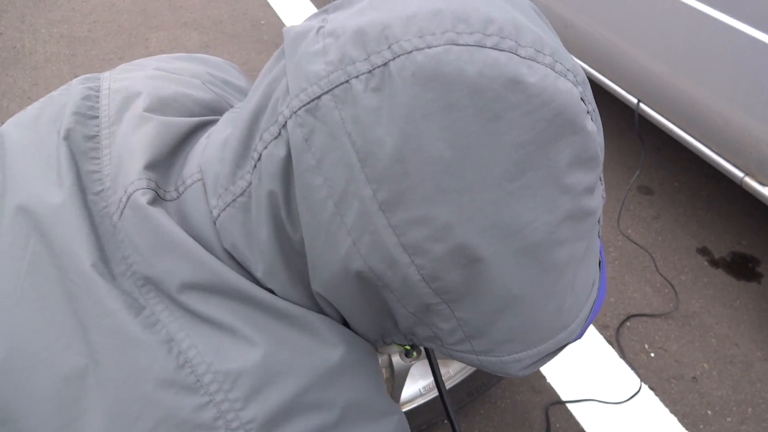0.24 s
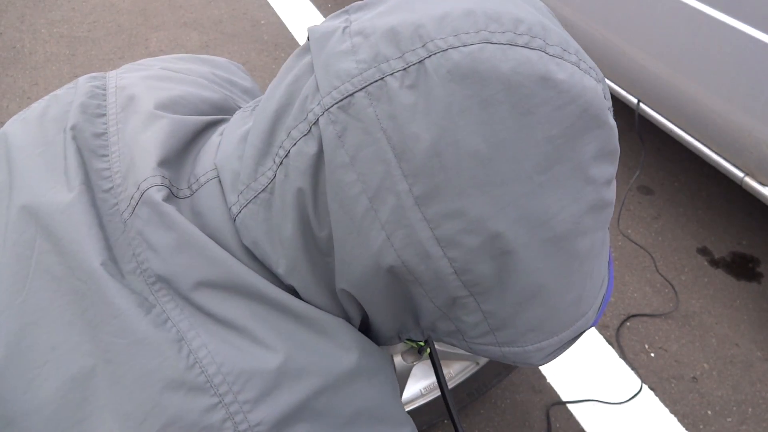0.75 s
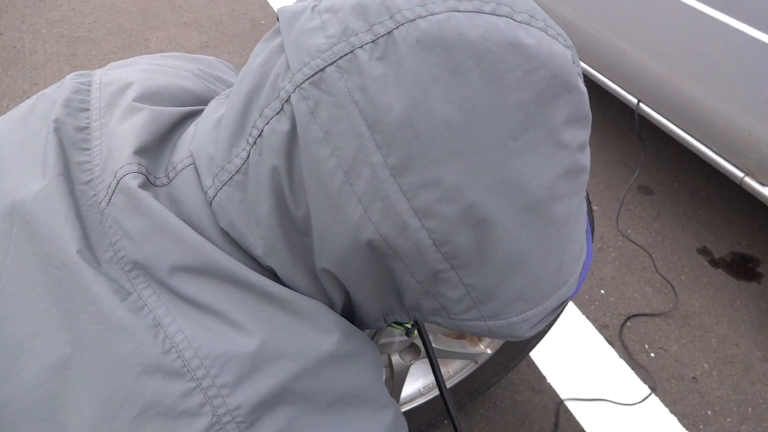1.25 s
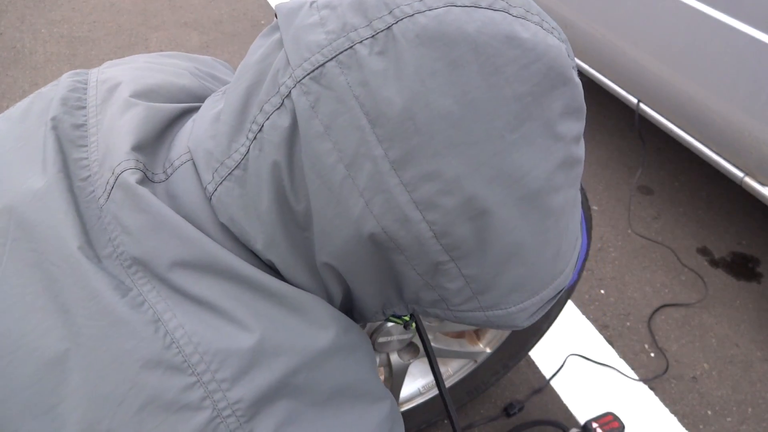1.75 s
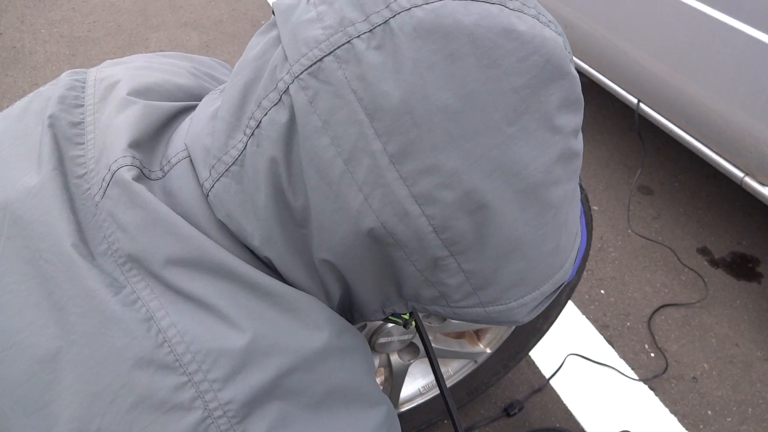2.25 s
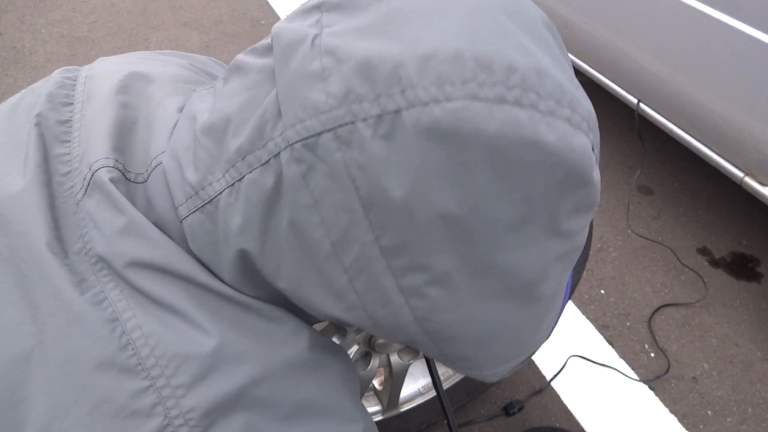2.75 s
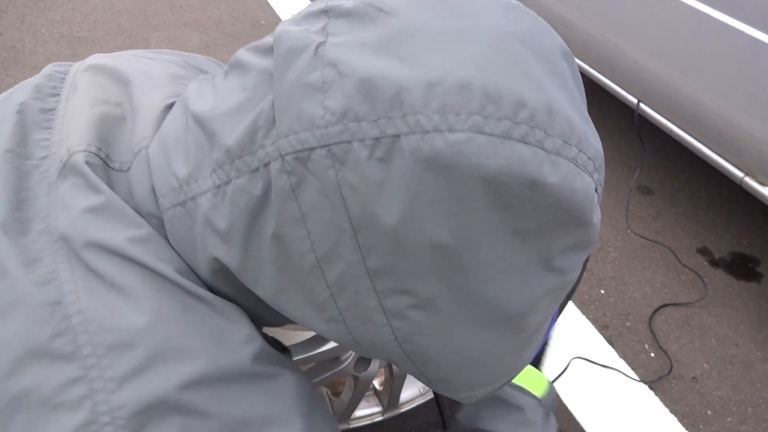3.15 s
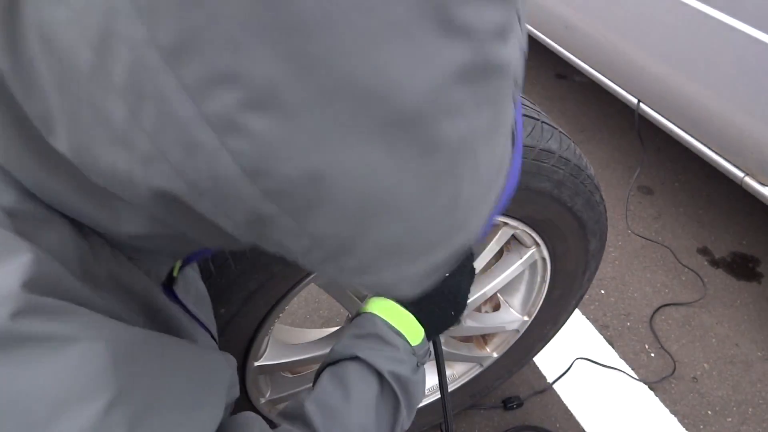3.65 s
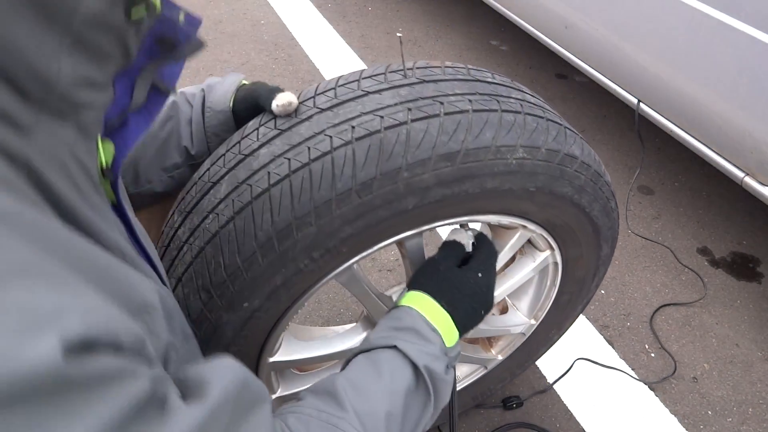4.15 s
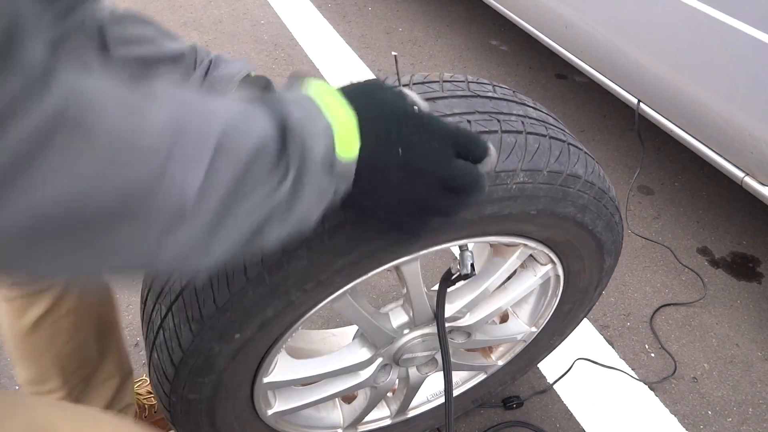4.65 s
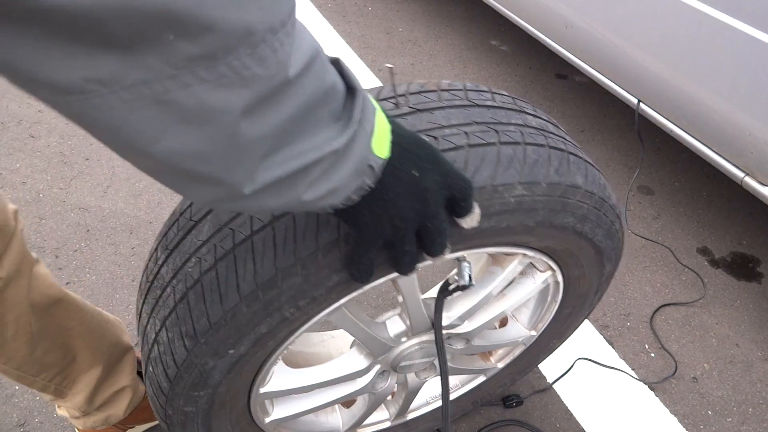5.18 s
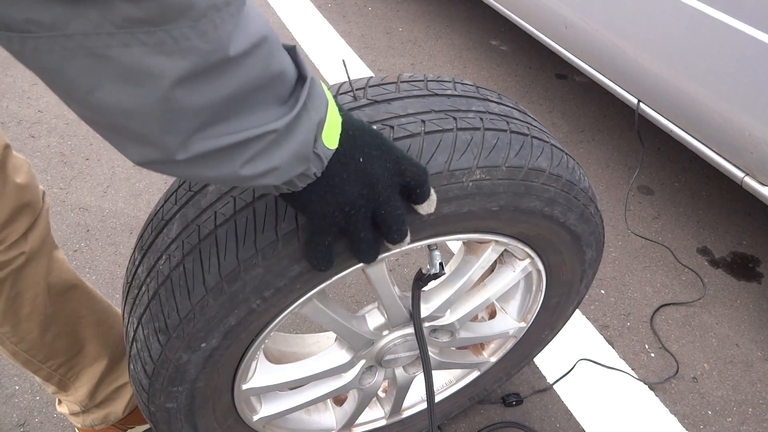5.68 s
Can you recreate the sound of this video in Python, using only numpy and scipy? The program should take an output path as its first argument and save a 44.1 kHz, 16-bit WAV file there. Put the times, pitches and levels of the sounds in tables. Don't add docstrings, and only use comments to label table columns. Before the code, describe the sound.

Continuous hard, nasal chatter of a portable tyre compressor on asphalt, slightly muffled and shifting as someone moves, then more open and even.

```python
import sys
import numpy as np
from scipy import signal
from scipy.fft import rfft, irfft
from scipy.io import wavfile
from scipy.ndimage import uniform_filter1d, map_coordinates

SR = 44100
rng = np.random.default_rng(int(sys.argv[2]) if len(sys.argv) > 2 else 0)


def linear_from_db(decibels):
    return 10 ** (np.asarray(decibels, float) / 20)


def pcm_store(signal):
    levels = np.round(np.clip(np.atleast_2d(signal), -1, 1) * 32767)
    wavfile.write(sys.argv[1], SR, levels.astype(np.int16).T)


N = 261072
TIME_S = np.arange(N) / SR
FREQUENCY_HZ = np.arange(N // 2 + 1) * SR / N


def rms_one(x):
    return x / np.sqrt(np.mean(x ** 2) + 1e-20)


def in_time(rows):
    s, *columns = np.transpose(rows)
    return [np.interp(TIME_S, s, column) for column in columns]


def coloured(x, points):
    hz, db = np.transpose(points)
    log_hz = np.log(np.maximum(FREQUENCY_HZ, 1))
    gain_db = np.interp(log_hz, np.log(hz), db, left=-70, right=-70)
    return rms_one(irfft(rfft(x) * linear_from_db(gain_db), N))


def resonance(x, hz, width_hz):
    r = np.exp(-np.pi * width_hz / SR)
    peak = (1 - r * r) / 2
    return signal.lfilter([peak, 0, -peak], [1, -2 * r * np.cos(2 * np.pi * hz / SR), r * r], x)


def moving_peak(x, hz, width_hz):
    spin = np.exp(2j * np.pi * np.cumsum(hz) / SR)
    lowpass = signal.butter(2, width_hz, fs=SR, output="sos")
    return rms_one(np.real(signal.sosfilt(lowpass, x * np.conj(spin)) * spin))


def drift(rate_hz):
    count = int(N * rate_hz / SR) + 2
    return np.interp(TIME_S * rate_hz, np.arange(count), rng.standard_normal(count))


def grit(spread_db):
    return rms_one(rng.standard_normal(N) * linear_from_db(spread_db * np.minimum(rng.exponential(1, N), 5)))


# start_s, looseness of parts [0-1], firmness of seat on the ground [0-1],
# clear view past the body [0-1]
STATE = [(0, 0.87, 0, 0.2), (.6, 0.9, 0.07, 0.16), (1.22, 0.6, 0, 0.17), (1.36, 0.34, 0, 0),
         (1.75, 0.01, 0.64, 0), (2.3, 0.19, 0.6, 0.36), (2.9, 0.24, 0.2, 0.32), (3.2, 0.5, 0.6, 0.2),
         (3.45, 0.3, 1, 0.33), (3.7, 0.51, 0.9, 0.53), (4.2, 0.7, 1, 0.4), (4.7, 0.37, 0.85, 0.89),
         (5.3, 0.34, 0.85, 1), (5.92, 0.3, 0.75, 1)]


def by_state(rest, *per):
    rows = np.array(STATE)
    return in_time(np.c_[rows[:, 0], rest + rows[:, 1:] @ per])[0]


ANSWERS = {"knock dB": (-26, 3, 2.5, -3, -1.5), "snap dB": (-31, -11, 2.5, 2, 0),
           "whine dB": (-27.5, -4.5, -8, 6, -3), "rattle 800 dB": (-29, 12, 1.5, 2, -13),
           "rattle 900 dB": (-30, -4.5, 2, 17, -1), "rattle 1400 dB": (-36, 17, -9, 11.5, 15.5),
           "rattle 1400 Hz": (1367, -10, 0, 45, 103), "broad rattle dB": (-28.5, 6, -4.5, -1, -4),
           "shadow depth": (-0.098, 0.61, 0.37, -0.31, 0.35), "modes 1 dB": (7, 1.5, -3, -3, -2),
           "modes 2 dB": (0, -17, 0.5, 8, -9), "modes 3 dB": (-3.5, -16, 25, 4, 3),
           "leak share": (0.4, 0.13, -0.053, 0.022, 0.091), "rattle 620 dB": (-45.5, 19, -2, -1, -2),
           "play": (1.0, 1.5, 0, -0.5, 1.0), "left-right dB": (-2.5, -0.4, 0.65, 0.9, 0.19),
           "hiss modes dB": (-1.5, -1.5, 0, -0.5, -5.5)}


def answer(part):
    jolt_s, jolt_length_s = 1.404, 0.078
    *steady, per_jolt = ANSWERS[part]
    return by_state(*steady) + per_jolt * np.exp(-((TIME_S - jolt_s) / jolt_length_s) ** 2)


# pitch_hz, width_hz, level_db
HOUSING = [(467.3, 23.5, 4.5), (612, 45, -11), (646, 16, -17), (884, 23, 2), (990, 11, 5.5),
           (1184, 76, -15), (639, 11, -6.5), (1275, 91, 2), (1457, 33, -1)]
MODE_GROUP = [0, 1, 0, 2, 1, 1, 0, 1, 3]


def contacts(turns, speed, table, late_ms, uneven_db):
    out = np.zeros(N)
    freedom_db = [0, answer("modes 1 dB"), answer("modes 2 dB"), answer("modes 3 dB")]
    late_ms = late_ms * np.clip(answer("play"), .2, 6)
    for at_turn, db, hz, ms in table:
        turn = np.round(turns - at_turn).astype(int)
        late, strength = np.clip(rng.standard_normal((300, 2)), -2, 2)[turn].T
        s = (turns - at_turn - turn) / speed - late_ms * late / 1000
        burst = np.exp(-(s * 1000 / ms) ** 2) * np.cos(2 * np.pi * hz * s)
        out += linear_from_db(db + uneven_db * strength) * burst
    out = rms_one(signal.sosfilt(signal.butter(4, 385, "high", fs=SR, output="sos"), out))
    ringing = 0
    for (hz, width_hz, db), group in zip(HOUSING, MODE_GROUP):
        ringing = ringing + resonance(out * linear_from_db(db + freedom_db[group]), hz, width_hz)
    return out + ringing


# order [per turn], rest_db, per_looseness_db, per_firmness_db, per_clear_view_db
SINGING = [(9, -45, 4.5, 0, 3.5), (8, -49.5, -9, 2.0, -5), (10, -36.5, -3.5, 1.5, 3),
           (11, -40, 7, -4, -3.5), (13, -48, 6, -2, -16), (21, -40.5, -11, 7, 1), (33, -44, 0.5, 8, 1.5),
           (14, -38.5, 8, -4.5, -1), (15, -28.5, -1, 2.5, -12.5), (16, -30, -7.5, 0, -0.5),
           (20, -42, 7, -7.5, 17.5), (23, -39, -7, 11, -13), (17, -44, -15, -1, 2), (18, -39.5, 5, -2, -7),
           (19, -46, 4, 3, 12.5), (26, -43, -13, 1, 1), (25, -39, -2, -3, -5), (30, -37, 4.5, 6, -10),
           (32, -35, -9, -8, -7)]


def singing(strokes, turns):
    out = 0
    for order, *levels_db in SINGING:
        spin = np.exp(2j * np.pi * order * turns)
        phase = np.angle(np.vdot(spin, strokes))
        out = out + linear_from_db(by_state(*levels_db) + 1.3 * drift(18)) * np.real(spin * np.exp(1j * phase))
    return out


# at_turn [0-1], level_db, pitch_hz, length_ms
KNOCKS = [
    (0.958, 6, 587, 1.56),
    (0.05, -3, 620, 0.69),
    (.095, -4.5, 1020, 0.73),
    (0.2, -3, 551, 3.7),
    (.44, -7.5, 880, 1.9),
    (.952, -4, 990, 0.85),
    (.832, -10, 630, 0.97),
]
# at_turn [0-1], level_db, pitch_hz, length_ms
SNAPS = [
    (.64, 7, 930, 0.62),
    (0.922, -19, 210, 0.89),
    (0.0953, -14, 1430, 0.99),
]


def pump(turns, speed):
    knocks = contacts(turns, speed, KNOCKS, late_ms=.06, uneven_db=1.2)
    snaps = contacts(turns, speed, SNAPS, late_ms=.03, uneven_db=2.0)
    strokes = linear_from_db(answer("knock dB") - 1.0) * knocks + linear_from_db(answer("snap dB") - 0.5) * snaps
    whine = np.sin(2 * np.pi * np.cumsum(796 + 7.03 * drift(30)) / SR)
    whine = whine * (1 + 0.47 * np.cos(2 * np.pi * (turns - .4)))
    hum = 0
    for order, db in [(2, -49), (4, -49), (5, -53), (6, -50.5), (7, -45)]:
        hum = hum + linear_from_db(db) * np.sin(2 * np.pi * order * turns)
    return strokes + singing(strokes, turns) + linear_from_db(answer("whine dB") + 2.5 + 1.8 * drift(20)) * whine + hum


# frequency_hz, density_db [dB per Hz]
RATTLE_FLOOR = [(250, -33), (400, -4.5), (520, -11), (640, -1), (800, -7.5), (1100, -2.5), (1500, -4.5),
                (1900, -31), (2500, -15)]


def rattle(turns):
    shake = grit(1.3) * linear_from_db(1.1 * np.cos(2 * np.pi * (turns - .72)) + 1.5 * drift(30))
    twice = resonance(resonance(shake, 686, 200), 686, 200)
    return (linear_from_db(answer("rattle 620 dB")) * rms_one(twice)
            + linear_from_db(answer("rattle 800 dB") - 4.5) * rms_one(resonance(shake, 775, 109))
            + linear_from_db(answer("rattle 900 dB") - 10.5) * rms_one(resonance(shake, 899, 52))
            + linear_from_db(answer("rattle 1400 dB") - 9.5) * moving_peak(shake, answer("rattle 1400 Hz"), 63)
            + linear_from_db(answer("broad rattle dB")) * coloured(shake, RATTLE_FLOOR))


def shadowed(x):
    loose, firm, view = in_time(STATE)
    x = x - np.clip(.6 - 0.83 * view, 0, 1) * resonance(x, 841, 30)
    x = x - np.clip(0.33 * loose - 0.16 * firm, 0, 1) * resonance(x, 530, 40)
    return x - np.clip(answer("shadow depth"), 0, 1) * resonance(x, 1076, 280)


# opens_turn [0-1], shuts_turn [0-1], sag_db, hiss_db, top_db
GUSTS = [
    (0.198, 0.52, -4, -0.5, 3),
    (0.612, 0.83, -10.5, 6.5, -5),
]


def gusts(turns, leak, column):
    flow = leak.copy()
    for opens, shuts, sag_db, *level_db in GUSTS:
        gone = ((turns - opens) % 1) / (shuts - opens)
        uneven_db = 2.8 * np.clip(rng.standard_normal(300), -2, 2)[(turns - opens + 1).astype(int)]
        strength = linear_from_db(level_db[column] + sag_db * gone + uneven_db)
        gate = np.clip(gone * 25, 0, 1) * np.clip((1.1 - gone) * 5, 0, 1)
        flow = flow + (1 - leak) * strength * gate
    return flow / np.sqrt(uniform_filter1d(flow ** 2, size=8000))


def tooth_noise(turns, spread_db, repeat):
    patterns = grit(spread_db)[:60 * 1000].reshape(60, 1000)
    again = map_coordinates(patterns, [turns / 6.0, (turns % 1) * 999], order=1)
    return np.sqrt(repeat) * rms_one(again) + np.sqrt(1 - repeat) * grit(spread_db)


# start_s, hiss_db, jet_over_hiss_db
AIR = [(0, -21.5, -3), (.9, -23.5, -4.5), (1.27, -26.5, -8), (1.4, -21.5, -4.5), (1.55, -24.5, -4.5),
       (1.83, -26.5, -1), (2.72, -25.5, -6.5), (2.98, -26, -3), (3.1, -24.5, -9), (3.36, -23.5, -6),
       (3.71, -25.5, -7), (4, -23.5, -2), (4.32, -24.5, -3.5), (5.31, -25.5, -2), (5.92, -25, -5)]
# frequency_hz, density_db [dB per Hz]
HISS_FLOOR = [(1500, -13), (2000, -5), (3000, -5.5), (5000, -6), (7000, -9), (9000, -13), (11000, -16.5)]
JET_TOP = [(6000, -16), (8000, -6.5), (9500, -3), (10400, 5), (11500, -3)]
# frequency_hz, level_db
HISS_TILT = [(1500, 12.5), (3000, -1.5), (6000, 2.5), (10000, 5.5)]
# pitch_hz, width_hz, level_db, per_firmness_db, per_clear_view_db
HISS_MODES = [(1680, 190, 3.5, -5.5, -28), (2246, 75, 4.5, -2, -1.5), (2712, 58, 8, -1, 1),
              (2990, 57, 2, 7, -5), (3490, 88, 4.5, 0, 4.5), (3780, 54, 8, -8.5, 6.5),
              (4330, 135, -6.5, 12, 6), (4786, 117, 4.5, -11.5, 12.5), (5220, 320, -2, 4.5, 2.5),
              (5940, 170, -3.5, 6, 3.5), (6570, 110, -8, 8.5, 4), (7470, 100, 0, 0, -12),
              (8270, 100, 0.5, 0, -6), (9360, 87, -6.5, 5, -4)]
# pitch_hz, width_hz, depth [0-1]
VALLEYS = [(1840, 390, 0.37), (2260, 27, 0.24), (3240, 79, 1), (4180, 84, 0.06), (6760, 110, .5),
           (8530, 600, 0.4)]
# start_s, hollow_hz (between coat and tyre), hollow_db, echo_delay_ms, echo_share [0-1]
BODY = [(0, 5630, -11.5, 1.055, 0.2), (.95, 5740, -6, 1.08, 0.18), (1.28, 5550, -6, 1.13, 0.2),
        (1.36, 5000, -20.5, 0.69, 0), (1.52, 5300, -12, 0.37, 0.09), (1.6, 5440, -14, 0.328, 0.35),
        (1.93, 5300, -10, 0.335, 0.4), (2.1, 5970, -10, .67, 0.051), (2.55, 6150, -11.5, 0.69, 0.14),
        (2.9, 5950, -9.5, .67, 0.066), (3.05, 5250, -11.5, .21, 0.09), (3.45, 4760, -9, 0.2, 0.13),
        (3.6, 5660, -12, 0.95, 0.33), (3.8, 5530, -19, 0.91, 0.15), (4.4, 5270, -20, 0.83, 0),
        (4.7, 5100, -27, 1.14, 0), (5.92, 5100, -35, 1.15, 0.046)]


def air(turns):
    hiss_db, top_db = in_time(AIR)
    _, firm, view = in_time(STATE)
    hollow_hz, hollow_db, echo_ms, echo = in_time(BODY)
    leak = np.clip(answer("leak share"), .05, .95)
    jet = tooth_noise(turns, spread_db=2.5, repeat=0.17) * gusts(turns, leak, column=0)
    other = tooth_noise(turns, spread_db=1.5, repeat=0.073) * gusts(turns, leak, column=0)
    other = coloured(other, HISS_TILT)
    rung = 0
    for k, (hz, width_hz, db, firm_db, view_db) in enumerate(HISS_MODES):
        gain = linear_from_db(db + firm_db * firm + view_db * view + 2.1 * drift(9))
        rung = rung + (-1) ** k * gain * resonance(other, hz, width_hz)
    hiss = (linear_from_db(-1.0) * coloured(jet, HISS_FLOOR) + linear_from_db(answer("hiss modes dB")) * rms_one(rung)
            + linear_from_db(hollow_db + 1.5 * drift(7.1)) * moving_peak(other, hollow_hz, width_hz=340))
    delayed = np.interp(np.arange(N) - echo_ms * SR / 1000, np.arange(N), hiss)
    hiss = (hiss + echo * delayed) / np.sqrt(1 + echo ** 2)
    for hz, width_hz, depth in VALLEYS:
        hiss = hiss - depth * resonance(hiss, hz, width_hz)
    top = coloured(grit(3.8) * gusts(turns, 0.69 * leak, column=1), JET_TOP)
    top = top + linear_from_db(-6.0 + 16 * np.minimum(view, .55)) * resonance(top, 10530, 160)
    return linear_from_db(hiss_db + 0.85 * drift(12)) * (hiss + linear_from_db(top_db - 1.5) * top)


# frequency_hz, lead_radians, level_db
LEFT_LEAD = [(0, .1, 1.5), (380, .36, -.8), (520, 0.44, 1.2), (800, 0.46, 0.9), (1500, 0.54, -0.5),
             (3000, 0.24, .1), (4500, .12, 0.4), (12000, .08, .2)]
# frequency_hz, level_db
SCATTER = [(100, -10), (300, -4), (500, -1.5), (900, -5.5), (1150, -3), (2400, 0.5), (5600, -2),
           (12000, -1.5)]


def surroundings(x):
    hz, radians, db = np.transpose(LEFT_LEAD)
    lead = np.exp(.5 * np.interp(FREQUENCY_HZ, hz, 1j * radians + np.log(linear_from_db(db))))
    direct = irfft(rfft(x) * np.array([lead, 1 / lead]), N)
    age_s = np.arange(16000) / SR
    decay = linear_from_db(-60 * age_s / .6) * np.clip(age_s / .03, 0, 1)
    scatter = rng.standard_normal(len(age_s)) * decay
    already_running = np.r_[x[:16000], x]
    echo = coloured(signal.fftconvolve(already_running, scatter)[16000:N + 16000], SCATTER)
    return direct + linear_from_db(-13.0) * np.std(x) * echo * [[1], [-1]]


# start_s, level_db
WIND = [(0, -37.5), (.8, -41.5), (1.5, -38), (2.6, -42), (3.0, -43.5), (3.6, -39), (4.1, -47),
        (5.92, -46.5)]
# frequency_hz, density_db [dB per Hz]
WIND_COLOUR = [(7.1, -40), (12, 1.5), (81, 3), (136, -3), (264, -10), (330, -12), (430, -44), (730, -120)]
WIND_APART = [(12, 6), (60, -3), (130, -1), (220, -4), (330, -8), (450, -30)]
# centre_s, level_db
PUFFS = [(.12, 11.5), (.28, 5), (.35, -7), (.45, -8), (.86, 2), (.96, 3), (1.14, 1), (1.43, 6.5), (1.63, 4),
         (1.74, 5.5), (2.01, 4), (2.13, 2), (2.21, 9), (2.35, -6), (2.5, 8), (2.6, 12), (2.78, 0),
         (3.33, 10), (3.9, -7), (4.1, 0), (4.17, -17), (4.4, 4), (4.6, -8), (4.91, -5), (5.12, 10),
         (5.18, -6), (5.74, -1), (5.85, 5)]


def wind():
    shared = coloured(rng.standard_normal(N) * linear_from_db(0.66 * drift(14)), WIND_COLOUR)
    apart = coloured(rng.standard_normal(N) * linear_from_db(0.66 * drift(14)), WIND_APART)
    puff_s = 0.026
    puffs_db = sum(db * np.exp(-((TIME_S - s) / puff_s) ** 2) for s, db in PUFFS)
    ports = shared * linear_from_db([[-.7], [.7]]) + linear_from_db(-6.5) * apart * [[1], [-1]]
    return linear_from_db(in_time(WIND)[0] + puffs_db) * ports


# start_s, peak_db, left_right_db
TICKS = [(0.1845, -53, -4), (1.0226, -41, 12), (1.2795, -55, -4.5), (1.4194, -48, -4), (1.6312, -45, 1.0),
         (1.6621, -63, -1.5), (1.7394, -60, -4), (1.8058, -47, -4.5), (1.8716, -51, 0), (2.0014, -47, 5),
         (2.1294, -54, -3), (2.2194, -40, 17), (2.2594, -39, -0.5), (2.386, -35, 3), (2.7187, -42, -2),
         (2.9894, -95, -6), (3.8546, -50, 11), (4.0497, -35, 2.0), (4.141, -47, -1.5), (4.3201, -52, 0),
         (4.4493, -54, -1), (4.582, -73, -14), (4.8394, -72, -19), (4.9846, -66, -6), (5.2094, -48, -3),
         (5.2699, -86, -11), (5.4525, -81, -2), (5.5174, -50, 5), (5.6072, -39, -9), (5.6421, -51, 2.5)]


def ticks():
    out, age_s = np.zeros((2, N)), np.arange(-200, 200) / SR
    for s, db, pan_db in TICKS:
        at = round(s * SR) - 100
        burst = rng.standard_normal(400) * np.exp(-(age_s / 0.0024) ** 2)
        out[:, at:at + 400] += linear_from_db(db + np.array([[pan_db], [-pan_db]]) / 2) * burst
    return linear_from_db(8) * signal.sosfilt(signal.butter(2, [11000, 11500], "band", fs=SR, output="sos"), out)


# start_s, speed [turns per s]
SPEED = [(0, 43.971), (0.25, 44.412), (0.5, 43.998), (0.9, 44.367), (1.25, 44.289), (1.45, 44.941),
         (1.65, 44.769), (1.95, 45.178), (2.25, 44.893), (2.5, 44.96), (3.05, 44.86), (3.4, 45.089),
         (3.8, 45.189), (4.1, 44.939), (5, 44.94), (5.92, 44.956)]


def scene():
    speed, = in_time(SPEED)
    turns = np.cumsum(speed) / SR
    pan_db = answer("left-right dB")
    housing = shadowed(rattle(turns) - pump(turns + 0.015, speed))
    near = surroundings(housing + air(turns))
    return near * linear_from_db(np.array([pan_db, -pan_db]) / 2) + wind()


def steadied(x, share):
    level = uniform_filter1d(np.mean(x ** 2, axis=0), size=2940)
    return x * (level / np.mean(level)) ** (-share / 2)


def band_limit(x):
    return signal.sosfilt(signal.butter(12, 12360, fs=SR, output="sos"), x)


def record(dry):
    soft = 1.137 * np.tanh(steadied(dry, share=0.96) / 1.041)
    cut = signal.sosfilt(signal.ellip(14, .5, 75, 11020, fs=SR, output="sos"), soft)
    return band_limit(cut + ticks())


dry = scene()
out = record(dry)
pcm_store(out)
```